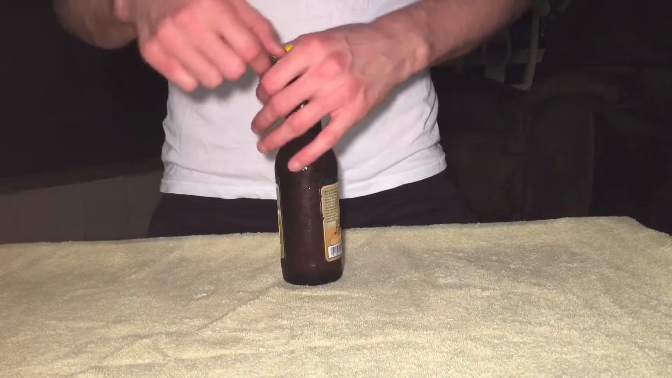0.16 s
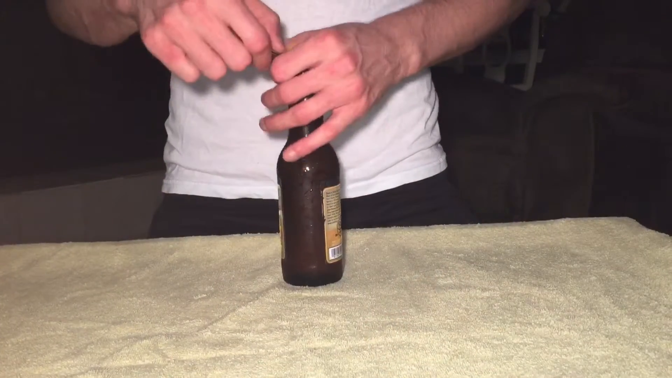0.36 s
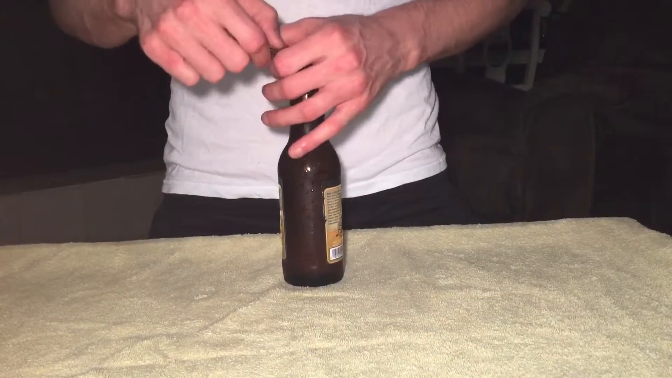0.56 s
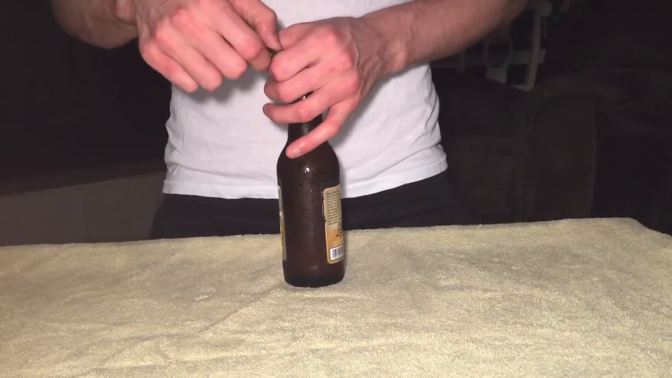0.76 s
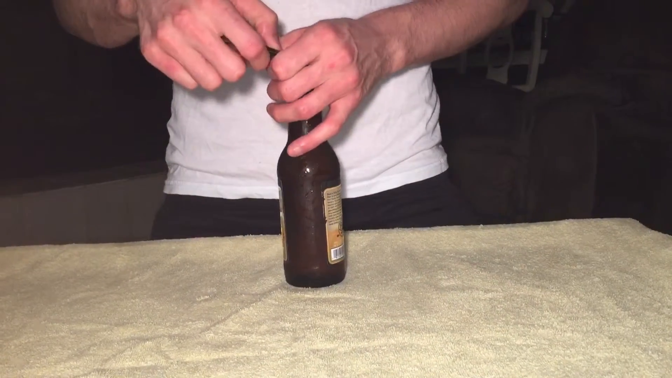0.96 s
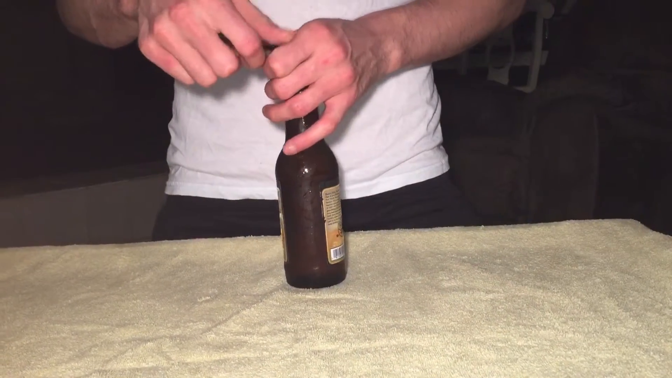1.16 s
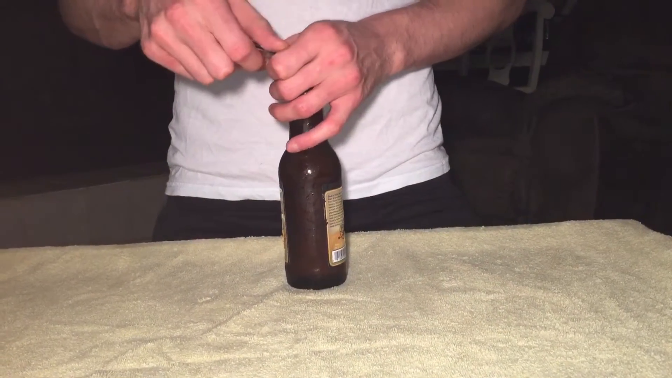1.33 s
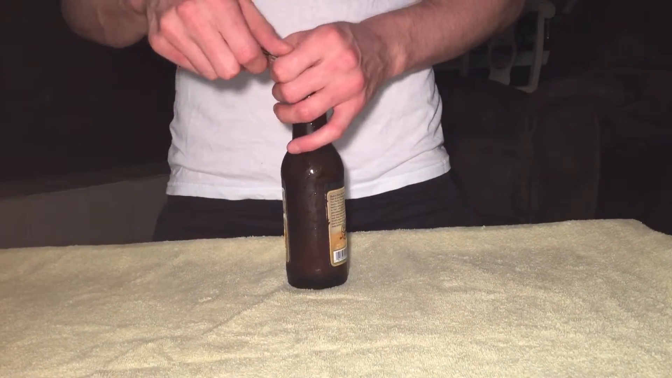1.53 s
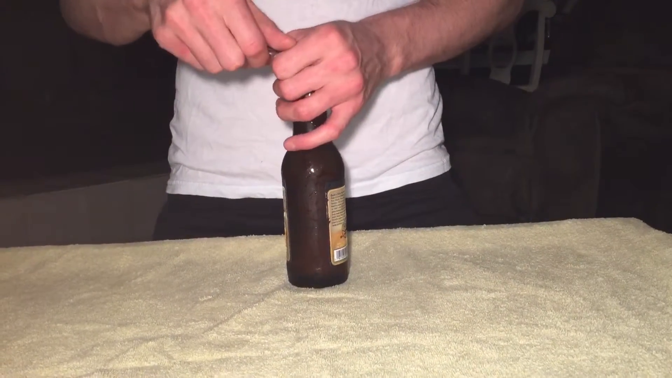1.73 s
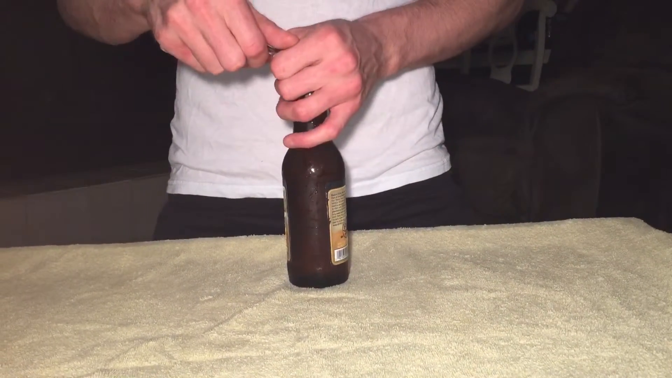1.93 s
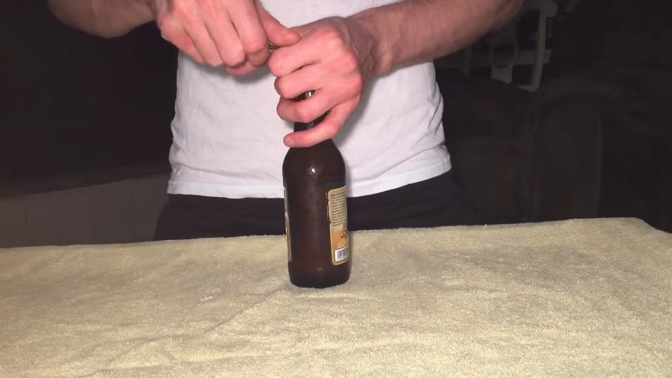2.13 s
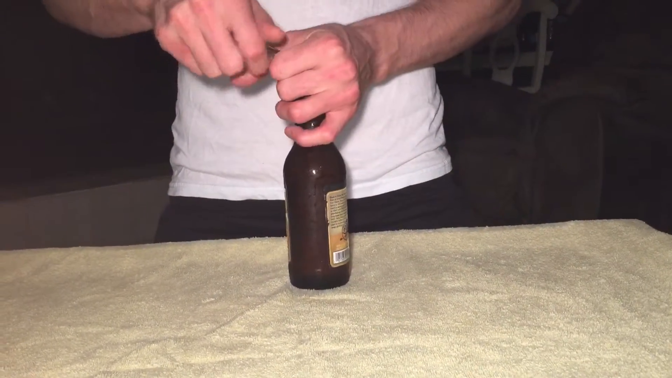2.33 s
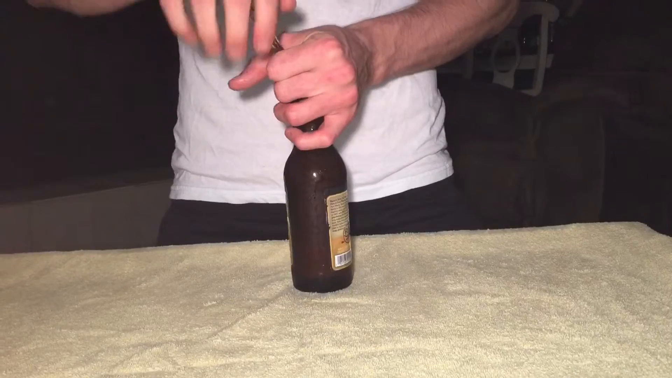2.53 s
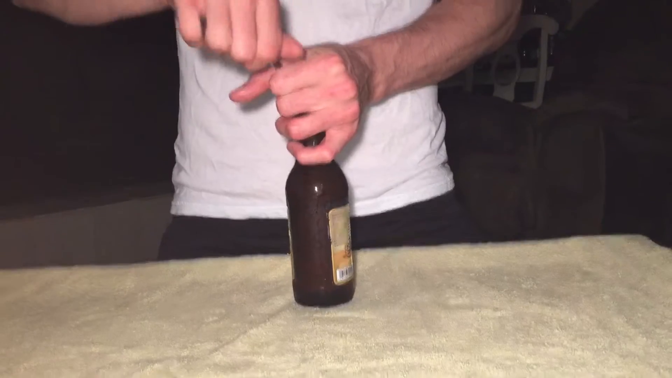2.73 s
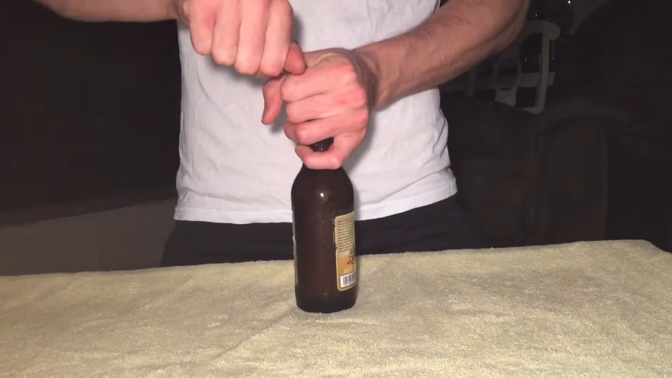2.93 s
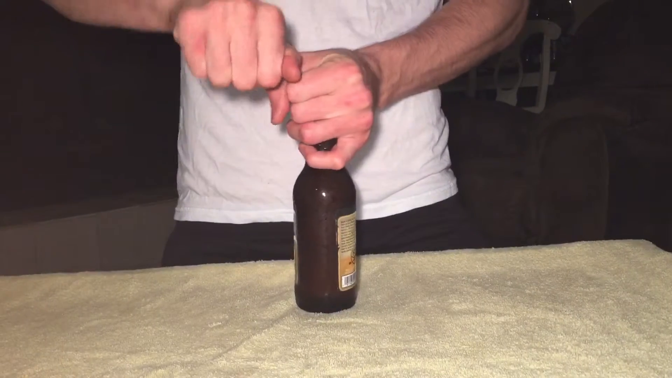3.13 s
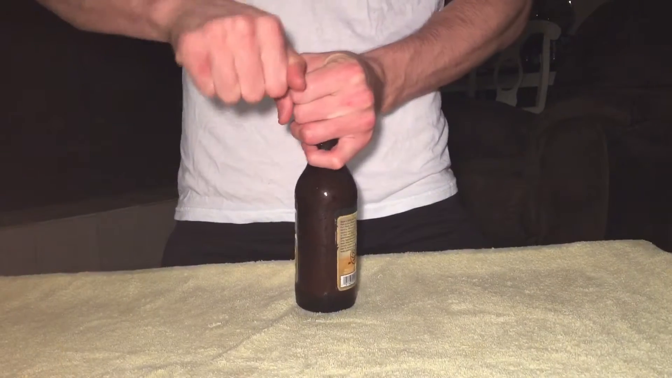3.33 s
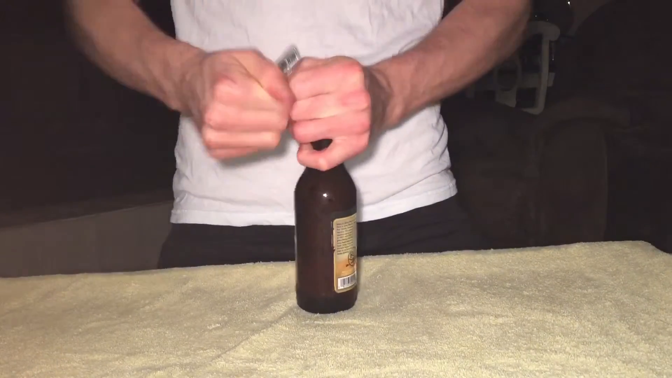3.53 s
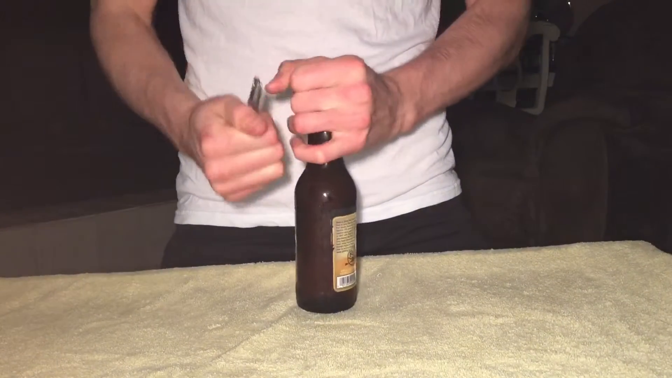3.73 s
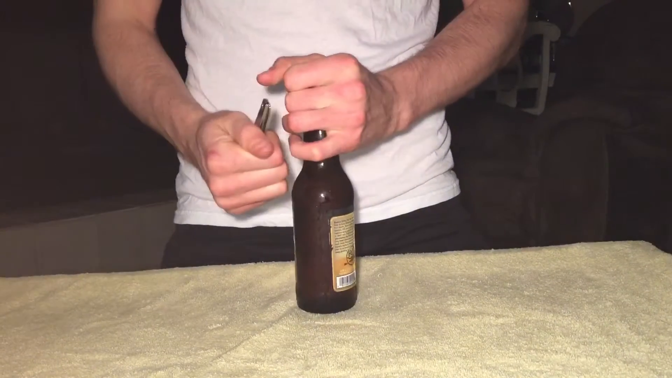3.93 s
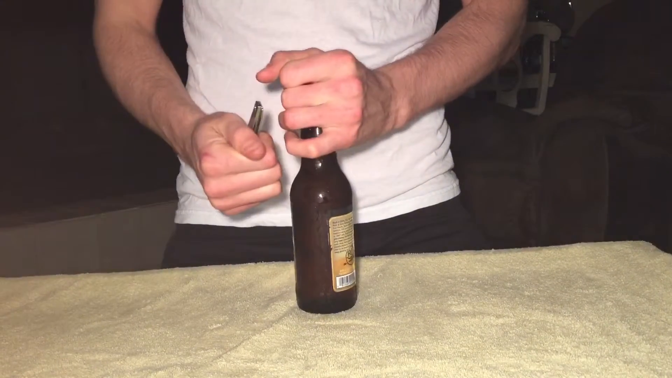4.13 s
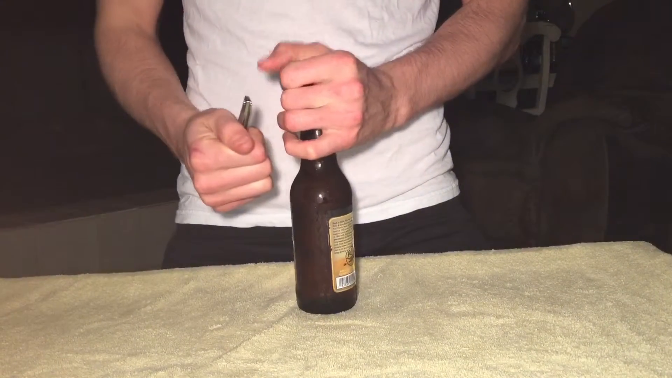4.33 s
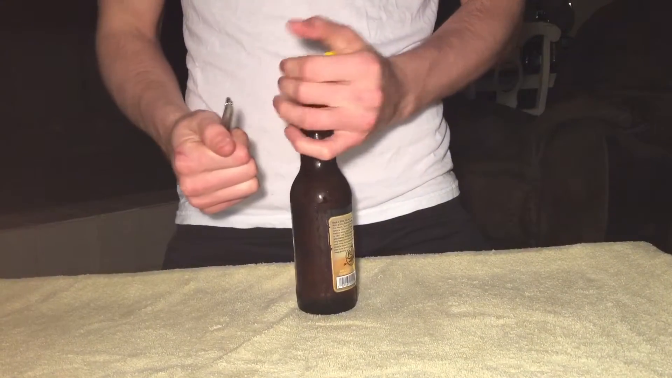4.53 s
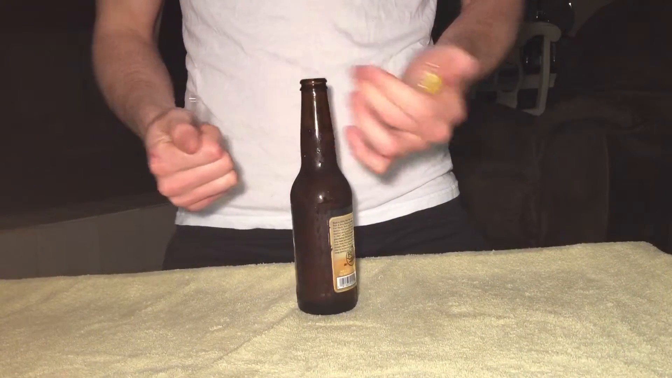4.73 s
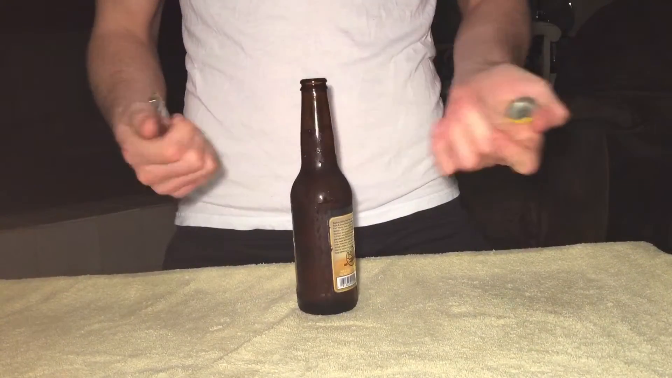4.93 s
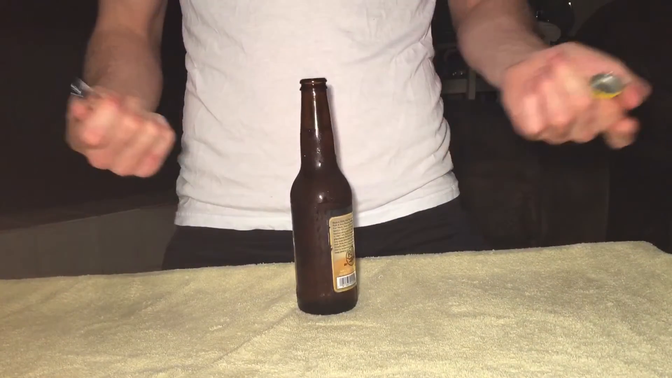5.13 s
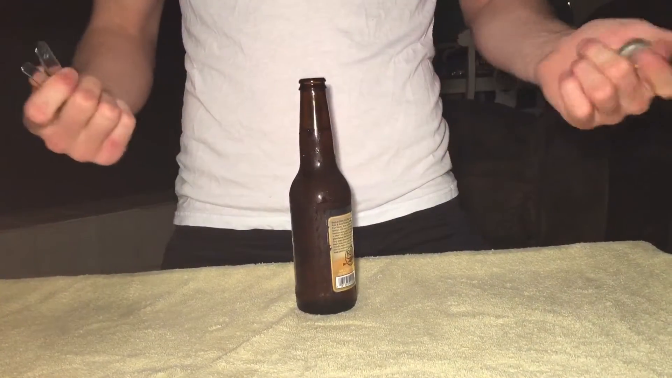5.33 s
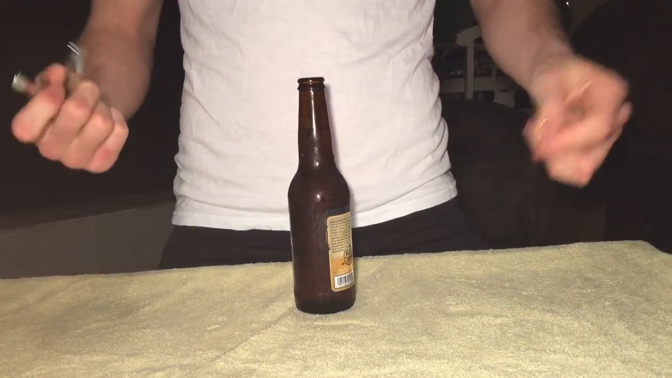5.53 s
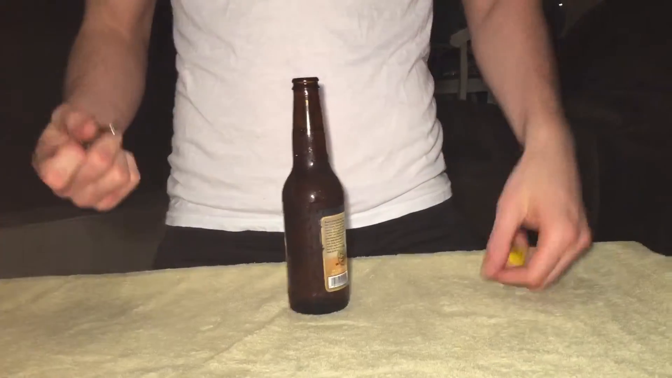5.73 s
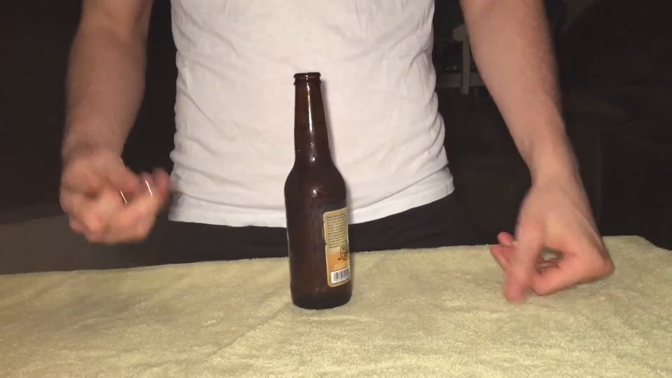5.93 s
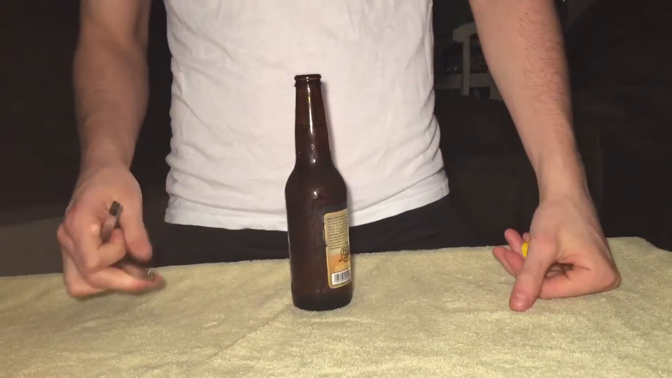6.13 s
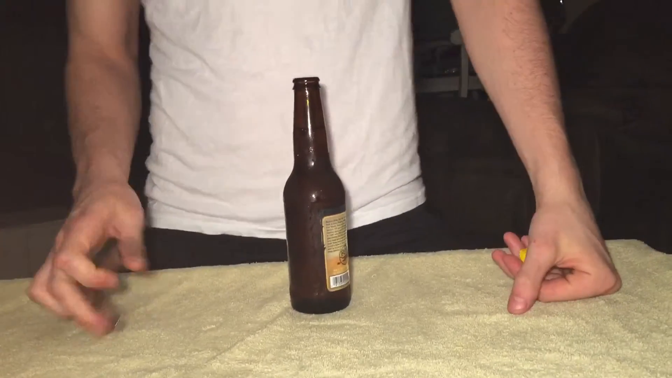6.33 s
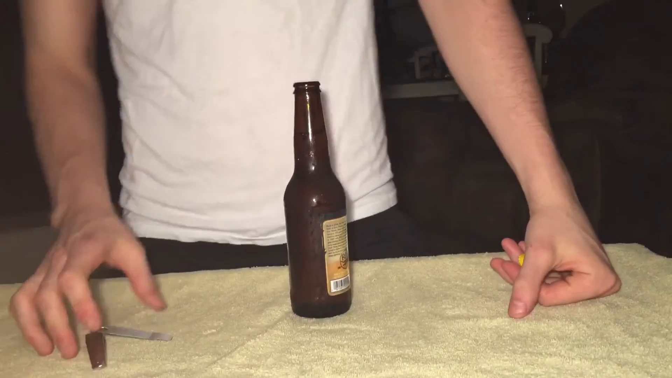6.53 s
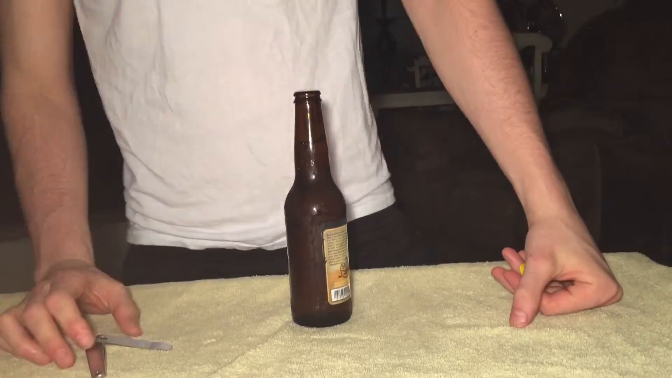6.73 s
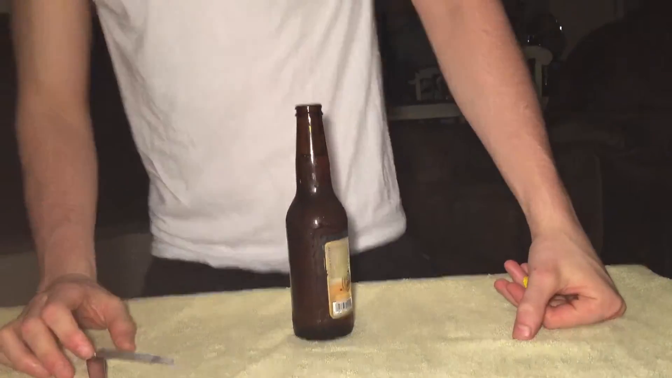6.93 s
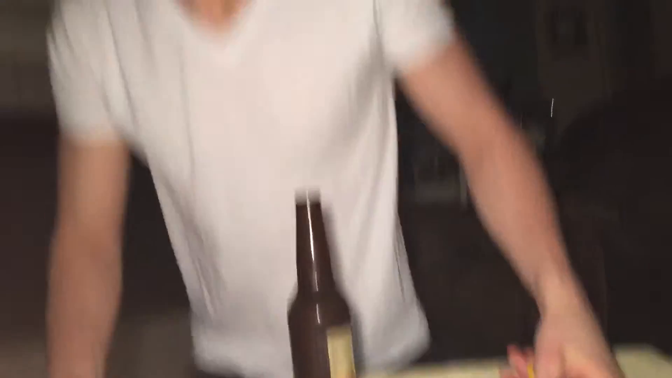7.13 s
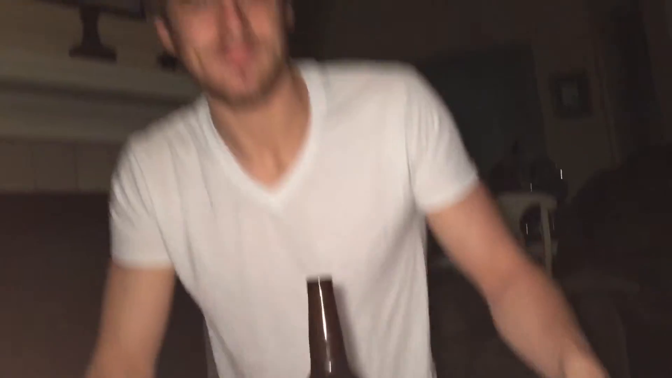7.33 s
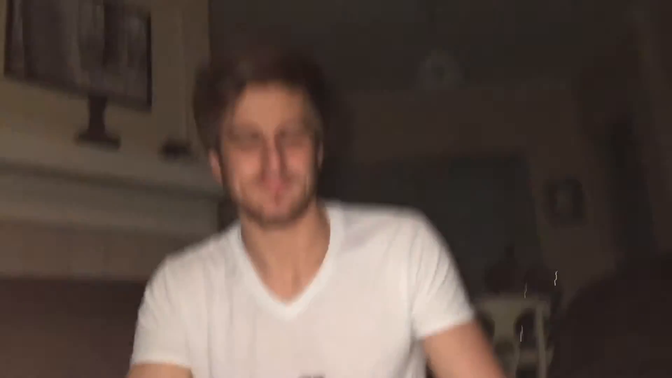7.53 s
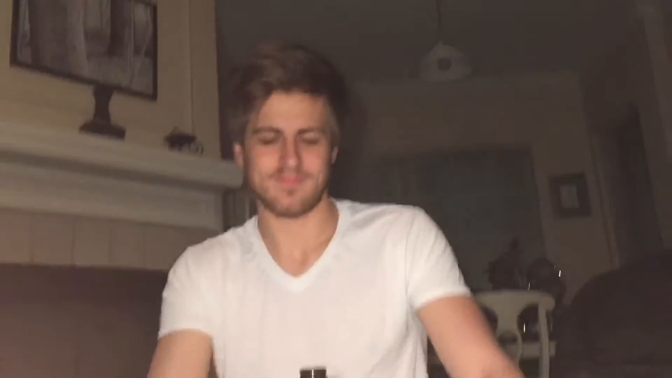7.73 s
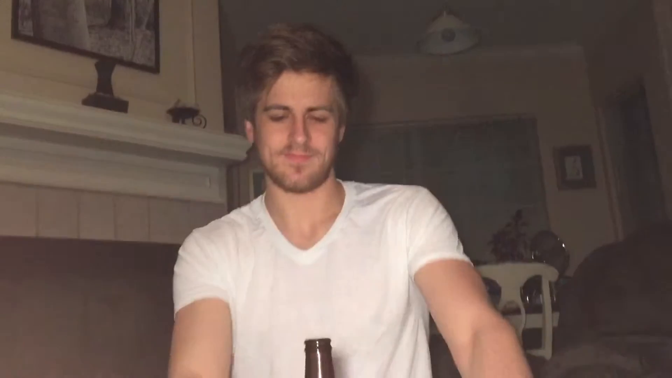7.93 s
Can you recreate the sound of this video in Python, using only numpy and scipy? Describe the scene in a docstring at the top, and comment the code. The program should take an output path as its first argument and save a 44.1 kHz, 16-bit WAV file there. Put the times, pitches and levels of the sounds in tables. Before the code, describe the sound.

Over a low room hum, steel clicks against a glass bottle's cap, which pops open, followed by a sharp snap and soft thud.

```python
"""Opening a bottle with nail clippers

Over a living room's mains hum, nail clippers pry at the crown cap of a glass bottle. Each slip of the
steel scrapes and excites damped modes of cap and glass. Gas hisses, the crimp lets go and the air in
the neck resonates with a pop; the loose cap ticks as it lifts off. The clippers snap in the hand and
land on a towel-covered table; the person sits down on a seat that creaks by stick-slip friction."""
import sys
import numpy as np
from scipy import signal
from scipy.fft import rfft, irfft, next_fast_len
from scipy.io import wavfile
from scipy.ndimage import map_coordinates

SR = 44100
rng = np.random.default_rng(int(sys.argv[2]) if len(sys.argv) > 2 else 0)


def to_wav(s):
    """Save 16-bit WAV."""
    ch = np.atleast_2d(s).T  # columns
    pcm = np.round(np.clip(ch, -1, 1) * 32767)  # PCM
    wavfile.write(sys.argv[1], SR, pcm.astype(np.int16))


N = 355645
CLOCK = np.arange(N) / SR
AGE = np.arange(int(.6 * SR)) / SR  # time since a blow [s]

# reverberation of the room: (frequency [Hz], t60 [s])
ROOM_DECAY = [(100, 0.58), (500, 0.27), (1500, .4), (3200, 0.33), (6500, 0.28), (10000, 0.26),
              (16000, 0.16)]
# hum of an appliance motor: (frequency [Hz], rms level [dB])
HUM_PARTIALS = [(59.1, -50), (118.2, -63), (177.3, -73), (234.5, -81.5), (292, -71.5), (409.5, -78.5),
                (469, -69)]
# background hiss and rumble: (frequency [Hz], level [dB])
AIR_SPECTRUM = [(80, -26), (140, -4), (200, -8), (295, -3.5), (350, -9), (470, -7), (550, -13),
                (1000, -17.5), (1600, -21.5), (4000, -27.5), (8000, -33), (16000, -41.5)]
RUMBLE_SPECTRUM = [(15, 2.5), (35, 6), (55, 1.5), (85, 3.5), (130, 0), (200, -10), (400, -37.5)]

# hands come down on the table: (time [s], level [dB], contact cutoff [Hz])
HAND_PATS = [(5.801, -40, 45), (5.873, -33.5, 164), (6.04, -34.5, 70), (6.841, -43.5, 45)]
# the bottle rocks on its base: (time [s], level [dB])
BOTTLE_ROCKS = [(1.254, -49)]
# table top, table on its legs, bottle base, seat frame: (frequency [Hz], level [dB], t60 [s])
TABLE_MODES = [(135.5, -4, 0.085), (238, -2.5, 0.076), (369.7, -2.5, 0.15), (465, -5.5, 0.078),
               (670, -12, 0.056), (920, -15, 0.037)]
SWAY_MODES = [(74.6, -9.5, 0.12)]
BASE_MODES = [(610, -1, 0.06), (964, 0, 0.061)]
FRAME_MODES = [(129.4, -5, .14), (152, 1, 0.044), (287, -13, 0.16), (354, -8.5, .053)]
# shirt and upholstery rub: (time [s], duration [s], level [dB])
CLOTH_RUBS = [(6.74, .24, -63), (6.8, .75, -69), (6.95, .06, -63), (7.56, .05, -59), (7.58, .6, -69),
              (7.645, .13, -56.5), (7.735, .05, -56)]
# the body drops into the seat, which creaks under the weight: (time [s], level [dB])
SEAT_THUMPS = [(7.558, -35.5), (7.585, -43.5)]
SEAT_CREAKS = [(7.567, -46), (7.5821, -57), (7.6745, -41), (7.6844, -43.5), (7.9225, -51), (7.928, -38.5),
               (7.933, -32.5), (7.9834, -37.5), (7.9977, -37.5), (8.0157, -40)]
# rubbing cloth and a creak: (frequency [Hz], level [dB])
CLOTH_SPECTRUM = [(240, -23), (400, -4), (700, -5), (1400, -3.5), (3300, -10), (5000, -15), (9300, -20.5),
                  (16000, -30)]
CREAK_SPECTRUM = [(400, -31), (900, -16), (1200, -5.5), (2000, 5.5), (3400, 1), (4400, -6), (5500, -20),
                  (16000, -27)]

# the clippers shift in the hand: (time [s], level [dB], contact time [s])
HAND_SNAPS = [(5.3103, -12.5, .001), (5.6225, -52, .0015)]
# the clippers meet the table: (time [s], thud level [dB], jingle level [dB])
LANDING_HITS = [(6.5315, -18, -33.5), (6.5415, -21, -29), (6.549, -21, -40)]
# the clippers' leaves and lever: (frequency [Hz], level [dB], t60 [s])
LEAF_MODES = [(2850, -13, 0.014), (3530, -14, .012), (4100, -10, .012), (6700, -6, .012), (7330, -1, .012),
              (7620, 0.5, .02), (11500, 0, .015), (13100, 0.5, 0.017)]
LEVER_MODES = [(1840, -8.5, 0.149), (1895, -8, 0.033), (4634, -12.5, 0.029)]
# snapping steel, contact through the towel, jingling lever: (frequency [Hz], level [dB])
SNAP_SPECTRUM = [(500, -45), (1000, -41), (1480, -16), (1870, -32), (2400, -22), (2900, -12), (3150, -16),
                 (3500, -5.5), (4100, -7), (5900, -14.5), (6600, -.5), (7600, 1.5), (8900, -6), (11600, 4),
                 (16000, -1)]
TOWEL_SPECTRUM = [(40, -35), (100, 2.5), (300, -0.5), (520, 1), (750, -15), (1000, -8), (1500, -16),
                  (2200, -28), (4000, -44), (9000, -57.5)]
JINGLE_SPECTRUM = [(2500, -8), (4500, -14), (5700, 0.5), (6600, 0), (7400, -13.5), (8400, 0), (9700, -12),
                   (11400, 4), (13200, -3), (14100, -10), (15500, -8.5)]

# steel slips on the cap; the last two ticks are the loose cap lifting off the neck:
# (time [s], level [dB], cap pitch [Hz], glass share [dB], grit share [dB])
CAP_TICKS = [(0.2582, -3, 3222, -21, -20.5), (0.3551, -29.5, 3110, -3, -8.5),
             (0.4594, -23, 3240, -13.5, -16.5), (0.5933, -26, 3125, -14.5, -20),
             (0.6072, -20.5, 3230, -7.5, -15.5), (0.7182, -35.5, 3160, -16.5, -25),
             (0.9269, -33, 3230, -22.5, -30), (1.0396, -43, 3550, -26, -19.5),
             (1.1028, -29, 3230, -14, -25), (1.2053, -46, 3280, -18, -27),
             (1.2534, -33.5, 3140, -17.5, -24), (1.2588, -30.5, 3160, -17, -30),
             (1.3104, -48.5, 3200, -22.5, -34), (1.6706, -21, 3093, -13, -26),
             (1.8597, -39.5, 3320, -7, -13), (2.3201, -49, 3360, -6, -8), (2.5946, -62, 3370, -11, -12.5),
             (4.4392, -45, 3390, -35, -25), (4.4753, -50.5, 3240, -30, -15.5)]
# the jaw creeps along the crimp, and takes a new grip: (time [s], level [dB])
JAW_CREEPS = [(0.233, -61), (0.575, -50), (0.908, -63), (1.215, -59), (1.233, -52)]
NEW_GRIPS = [(3.0812, -33.5)]
# gripped cap; glass with steel lever: (frequency [Hz], level [dB], t60 before hand damping [s])
GRIPPED_CAP_MODES = [(2740, -12.5, .012), (3064, -4.5, 0.017), (3277, 5, .022), (3430, -0.5, 0.033)]
BOTTLE_MODES = [(1100, -34, 0.22), (1724, -35.5, .2), (1930, -33, 0.18), (3321, -20, .11),
                (3776, -15.5, .08), (4210, -17.5, 0.17), (4597, -5.5, .07), (4688, -2, .085),
                (5450, -26, .1), (5600, -20, 0.14), (5670, -17, 0.079), (6150, -12, .08), (6320, 0.5, .085),
                (6440, -9.5, .05), (7597, -17, .12), (8750, -12.5, 0.14), (8848, -9.5, .08),
                (9570, -15, .1), (9600, -11.5, .08), (12600, -17.5, .1), (14040, -18.5, .1),
                (15180, -21, .1)]
# scraping steel and the jaw biting the crimp: (frequency [Hz], level [dB])
GRIT_SPECTRUM = [(100, -28), (600, -2.5), (950, 0.5), (1300, -11), (2000, -4), (3000, 7.5), (4200, 3),
                 (5500, 0), (9000, -3), (11500, -8), (16000, -9.5)]
CRUNCH_SPECTRUM = [(1200, -28), (1900, -4), (2300, -21.5), (2750, -3.5), (3250, 1.5), (3650, 0),
                   (4200, -24), (6400, -28), (16000, -43.5)]

# the crimp lets go of the lip: (time [s], level [dB], ring share [dB])
CRIMP_RELEASES = [(3.529, -7.5, 0), (3.5377, -14.5, -5.5), (3.546, -12, -3.5)]
# freed cap and open neck; neck air and the room it shakes: (frequency [Hz], level [dB], t60 [s])
FREED_CAP_MODES = [(1094, -27.5, .22), (2800, -8, 0.017), (2920, -6, .016), (3190, -0.5, 0.018),
                   (3220, -6, .014), (3900, -22, 0.037), (4600, -12.5, 0.033), (5210, -23.5, 0.084),
                   (5660, -20.5, .07), (6740, -17.5, .03), (7540, -21.5, .07), (11400, -14.5, 0.043)]
NECK_AIR_MODES = [(83, -7, 0.15), (114.1, -5, 0.22), (179, -3, 0.15), (212.2, 1, 0.085), (372, -12, .08)]
# escaping gas and the crack of the crimp: (frequency [Hz], level [dB])
GAS_SPECTRUM = [(710, -69), (1200, -27.5), (2790, 3), (4170, -10.5), (4500, -14.5), (4960, -12.5),
                (6580, -2.5), (7250, -7.5), (9210, -2.5), (14700, -5), (16000, -17)]
CRACK_SPECTRUM = [(40, -33), (150, -9.5), (450, 0), (680, 3.5), (1000, -0.5), (1450, -10), (2150, -6.5),
                  (2900, 7), (3900, -2), (6000, 2), (7500, -8.5), (9000, -.5), (11500, -5), (16000, -13.5)]


def amp(db):
    """The decibel scale: 20 dB is a factor of ten in amplitude."""
    return 10 ** (np.asarray(db) / 20)


def along(points, hz):
    """Interpolation of (frequency, value) points on a logarithmic frequency axis."""
    freqs, values = np.transpose(points)
    return np.interp(np.log(hz + 1), np.log(freqs), values)


def wobble(rate):
    """Smooth random modulation: a spline through `rate` Gaussian values a second."""
    return map_coordinates(rng.standard_normal(int(N * rate / SR) + 4), [CLOCK * rate])


def noise(spectrum, size):
    """Spectral shaping of white noise, scaled to rms 1."""
    m = next_fast_len(size)
    gain = amp(along(spectrum, np.fft.rfftfreq(m, 1 / SR)))
    shaped = irfft(rfft(rng.standard_normal(m)) * gain, m)[:size]
    return shaped / np.sqrt(np.mean(shaped ** 2) + 1e-20)


def fade(t60, rise):
    """Exponential decay after a smooth onset, peak 1; both times in seconds."""
    shape = amp(-60 * AGE / t60) * (1 - np.exp(-(AGE / rise) ** 2))
    return shape / shape.max()


def stroke(start, length):
    """Envelope of a movement, peak 1: acceleration for 40% of its length, then slowing to rest."""
    phase = np.interp((CLOCK - start) / length, [0, .4, 1], [0, .5, 1])
    return np.sin(np.pi * phase)


def burst(spectrum, t60, rise):
    """A broadband transient: coloured noise under an exponential decay."""
    return noise(spectrum, len(AGE)) * fade(t60, rise)


def ring(modes, rise):
    """Modal superposition: damped sinusoids whose strengths vary slightly from blow to blow."""
    strengths = amp(rng.standard_normal(len(modes)))
    return sum(strength * amp(db) * fade(t60, rise) * np.sin(2 * np.pi * hz * AGE)
               for strength, (hz, db, t60) in zip(strengths, modes))


def in_room(x, wet_db):
    """Reverberation: the direct sound plus its convolution with a diffuse, decaying tail."""
    hz, t, bands = signal.stft(rng.standard_normal(len(AGE)), SR, nperseg=256)
    decay = amp(-60 * t / along(ROOM_DECAY, hz)[:, None])
    tail = signal.istft(bands * decay, SR, nperseg=256)[1][:len(AGE)]
    tail *= 1 - np.exp(-(AGE / .0082) ** 2)  # wall reflections take time to build up
    return x + amp(wet_db) * signal.fftconvolve(x, tail / np.linalg.norm(tail))[:len(x)]


def add(track, start, x):
    """Linear superposition: x joins the track at `start` seconds."""
    part = track[round(start * SR):][:len(x)]
    part += x[:len(part)]


def room_tone():
    """Amplitude and phase modulation make a motor's hum waver, over faint hiss and rumble."""
    (hum_hz, hum_db), *overtones = HUM_PARTIALS
    hum = amp(hum_db + .4 * wobble(3.6)) * np.sin(2 * np.pi * hum_hz * CLOCK + .06 * wobble(4))
    for hz, db in overtones:
        drift_rad = .8 * wobble(8)
        hum += amp(db + 3 * wobble(5)) * np.sin(2 * np.pi * hz * CLOCK + drift_rad)
    return np.sqrt(2) * hum + amp(-65) * noise(AIR_SPECTRUM, N) + amp(-61) * noise(RUMBLE_SPECTRUM, N)


def table_knocks():
    """Soft contact is a low-pass filter: hands excite the table's low modes. The bottle knocks once."""
    out = np.zeros(N)
    for start, db, cutoff_hz in HAND_PATS:
        modes = [(hz, level - 20 * np.log10(1 + (hz / cutoff_hz) ** 4), t60)
                 for hz, level, t60 in list(SWAY_MODES) + list(TABLE_MODES)]
        thud = ring(modes, rise=.002)
        add(out, start, amp(db) * in_room(thud / np.abs(thud).max(), wet_db=-7))
    for start, db in BOTTLE_ROCKS:
        add(out, start, amp(db) * in_room(ring(BASE_MODES, rise=.0025), wet_db=-14))
    return out


def sitting():
    """Friction noise of cloth adds in power; the seat's frame thumps on impact and ticks by stick-slip."""
    rubbing = np.sqrt(sum((amp(db) * stroke(start, length)) ** 2 for start, length, db in CLOTH_RUBS))
    out = rubbing * amp(-2.5 + 1.9 * wobble(90)) * noise(CLOTH_SPECTRUM, N)
    for start, db in SEAT_THUMPS:
        add(out, start, amp(db) * in_room(ring(FRAME_MODES, rise=.0016), wet_db=-5.5))
    for start, db in SEAT_CREAKS:
        tick = burst(CREAK_SPECTRUM, t60=.0165, rise=.0001)
        add(out, start, amp(db - 4.5) * in_room(tick, wet_db=-13))
    return out


def clippers():
    """Damped impacts: steel snaps in the fist, then lands on the towel with a thud and a jingle."""
    out = np.zeros(N)
    for start, db, contact_s in HAND_SNAPS:
        leaves = amp(-12.5) * ring(LEAF_MODES, rise=contact_s)
        crack = amp(-1.5) * burst(SNAP_SPECTRUM, t60=.014, rise=contact_s)
        add(out, start, amp(db - 4) * in_room(leaves + crack, wet_db=-9))
    for start, thud_db, jingle_db in LANDING_HITS:
        table = amp(-4.5) * ring(TABLE_MODES, rise=.0025)
        towel = amp(-2) * burst(TOWEL_SPECTRUM, t60=.024, rise=.00037)
        add(out, start, amp(thud_db) * in_room(table + towel, wet_db=-12))
        jingle = burst(JINGLE_SPECTRUM, t60=.048, rise=.00073)
        add(out, start, amp(jingle_db) * in_room(jingle, wet_db=-13))
    return out


def cap_tick(db, cap_hz, glass_db, grit_db):
    """Energy partition: what rings the glass is lost to the cap. Harder ticks are quicker and brighter."""
    force_db = db + 30  # relative to an ordinary tick
    contact_s = .0028 * .5 ** (force_db / 17.5)
    takeover_db = -7  # beyond this share the glass takes the blow from the cap
    cap_db = -6.5 - 20 * np.log10(1 + amp(glass_db - takeover_db) ** 2)
    upper_glass_db = glass_db - 4.5 + .344 * force_db
    excitation = [(3500, cap_db), (4600, glass_db), (6300, upper_glass_db), (7600, grit_db)]
    average_grip_hz = 3314  # the cap's pitch follows the grip
    cap_modes = [(hz * cap_hz / average_grip_hz, level, t60) for hz, level, t60 in GRIPPED_CAP_MODES]
    held_modes = [(hz, level + along(excitation, hz), .83 * min(t60, .2))  # the hand damps the ring
                  for hz, level, t60 in cap_modes + list(BOTTLE_MODES)]
    tone = ring(held_modes, rise=contact_s)
    grit = amp(grit_db + 1.5) * burst(GRIT_SPECTRUM, t60=.022 + 4 * contact_s, rise=.00017)
    # scraping radiates in all directions, so more of it returns from the walls
    return amp(db) * (in_room(tone, wet_db=-12.5) + in_room(grit, wet_db=-7))


def cap_handling():
    """Friction and impact: the jaw slips, creeps and grips anew; later the loose cap lifts off."""
    out = np.zeros(N)
    for start, db, cap_hz, glass_db, grit_db in CAP_TICKS:
        add(out, start, cap_tick(db, cap_hz, glass_db, grit_db))
    for start, db in JAW_CREEPS:
        add(out, start, amp(db) * burst(CRUNCH_SPECTRUM, t60=.09, rise=.012))
    for start, db in NEW_GRIPS:
        crunch = burst(CRUNCH_SPECTRUM, t60=.013, rise=.00063)
        lever = ring(LEVER_MODES, rise=.0014)
        add(out, start, amp(db - 3.5) * in_room(lever + crunch, wet_db=-11.5))
    return out


def opening():
    """Pressure release: gas leaks, the crimp tears free in three snaps and the neck's air resonates."""
    full_flow_s, lead_s, hold_s = 3.497, .051, .019
    widen_db_per_s, drain_db_per_s = 480, 899  # the gap widens, then the pressure is spent
    t = CLOCK - full_flow_s
    flow_db = widen_db_per_s * np.minimum(t, 0) - drain_db_per_s * np.maximum(t - hold_s, 0)
    seal_broken = t > -lead_s
    out = in_room(amp(flow_db - 36) * seal_broken * noise(GAS_SPECTRUM, N), wet_db=-10.5)
    for start, db, ring_db in CRIMP_RELEASES:
        crack = amp(-5.5) * burst(CRACK_SPECTRUM, t60=.024, rise=.00026)
        cap = amp(ring_db) * ring(FREED_CAP_MODES, rise=.00021)
        add(out, start, amp(db) * (in_room(cap, wet_db=-12.5) + in_room(crack, wet_db=-8.5)))
    pop = ring(NECK_AIR_MODES, rise=.0055)
    add(out, CRIMP_RELEASES[0][0], amp(-17) * in_room(pop, wet_db=-13.5))
    return out


def scene():
    """Superposition: the pressures of all sources add at one point."""
    return (cap_handling() + opening() + clippers() + table_knocks() + sitting() + room_tone())[None]


def record(dry):
    """Band limiting and soft saturation: deep bass and top treble are cut, the highest peaks rounded."""
    low_hz, top_hz = 46, 15950
    thinned = signal.sosfilt(signal.butter(4, low_hz, "highpass", fs=SR, output="sos"), dry)
    rounded = thinned / (1 + np.abs(thinned) ** 6) ** (1 / 6)
    m = next_fast_len(N + SR // 2)
    passband = np.fft.rfftfreq(m, 1 / SR) < top_hz
    return irfft(rfft(rounded, m) * passband, m)[..., :N]


dry = scene()
out = record(dry)
to_wav(out)
```